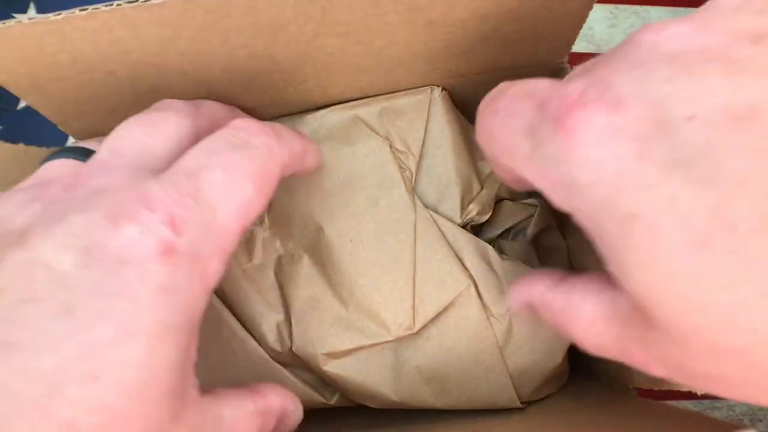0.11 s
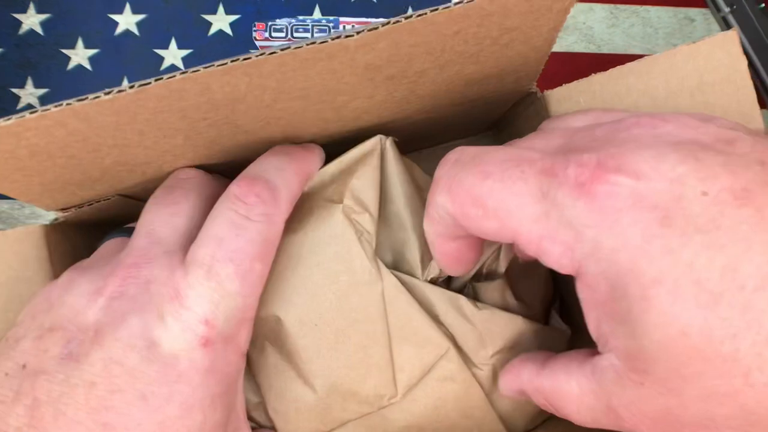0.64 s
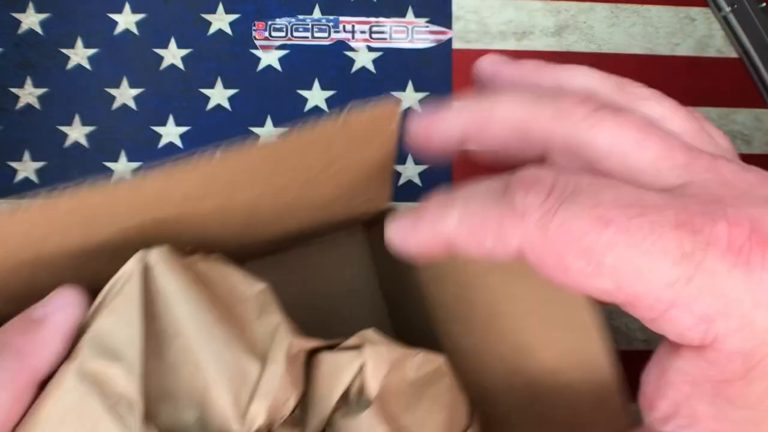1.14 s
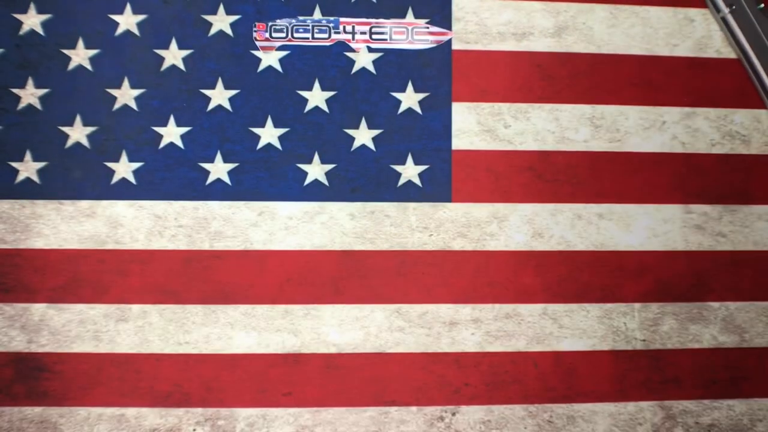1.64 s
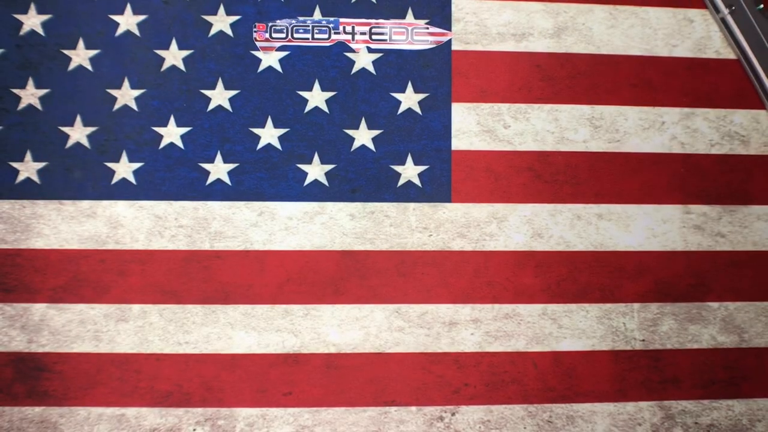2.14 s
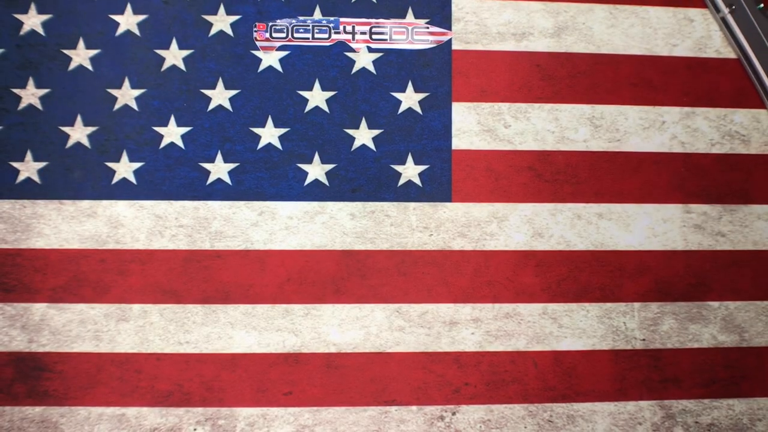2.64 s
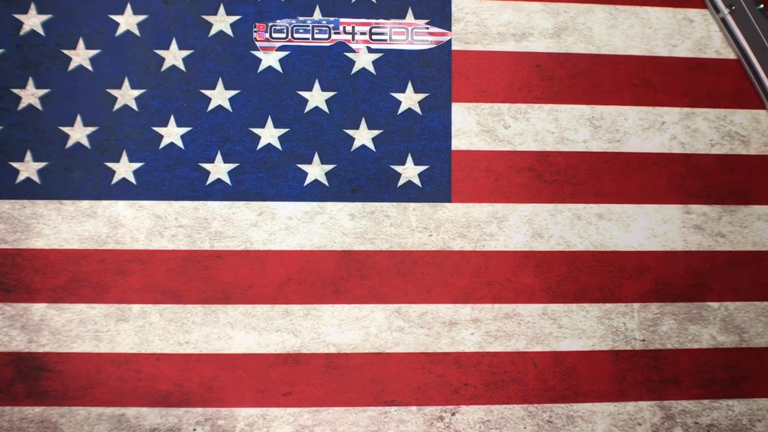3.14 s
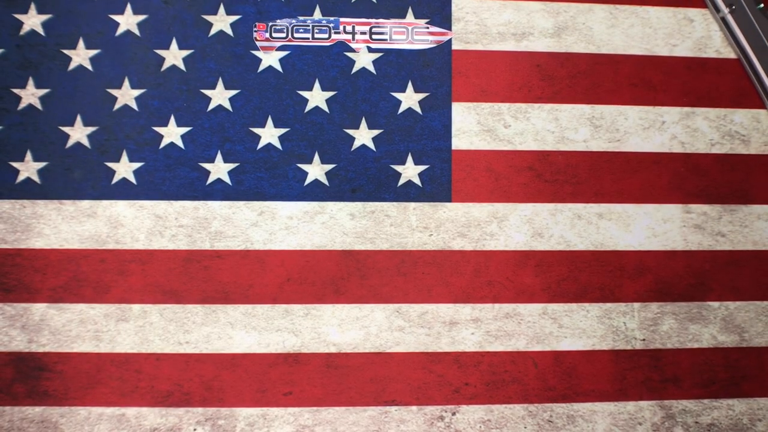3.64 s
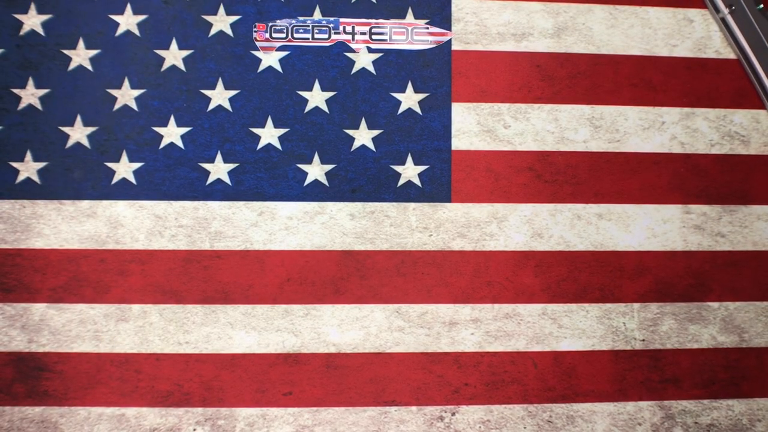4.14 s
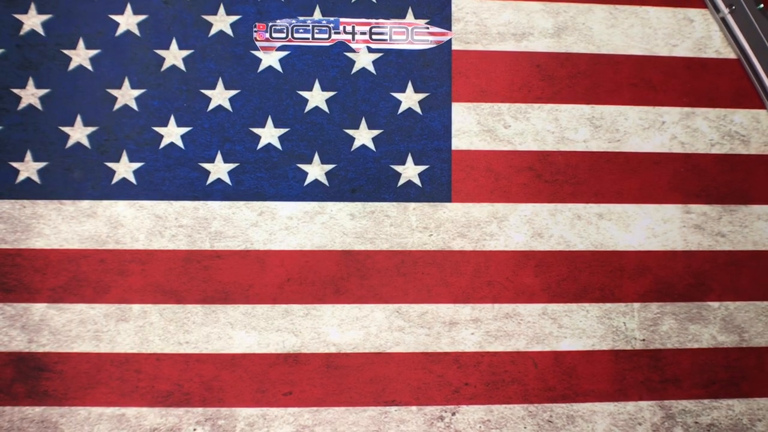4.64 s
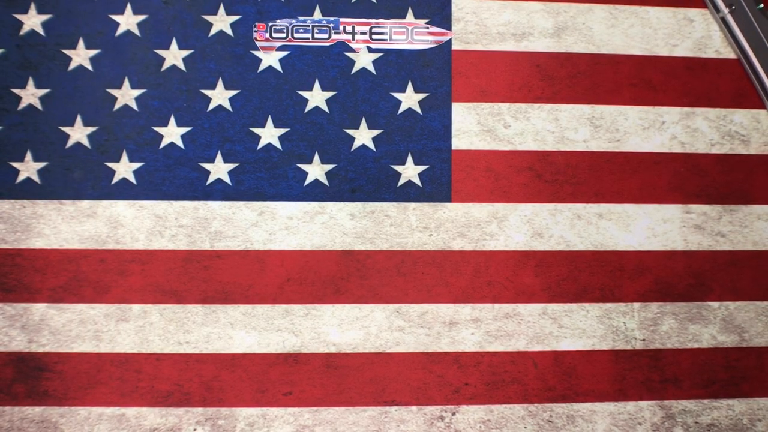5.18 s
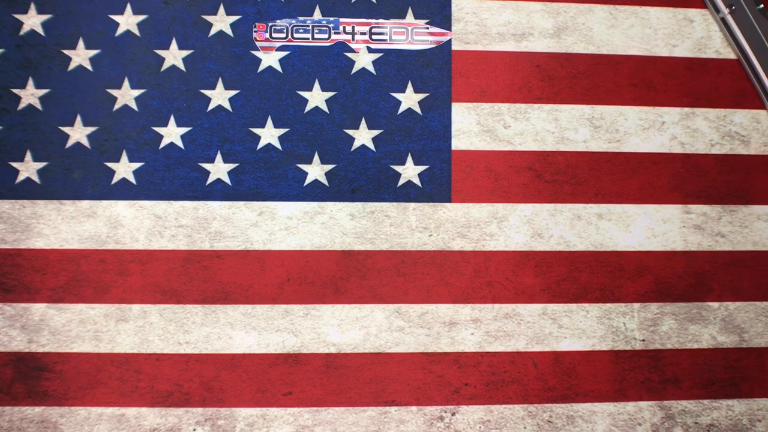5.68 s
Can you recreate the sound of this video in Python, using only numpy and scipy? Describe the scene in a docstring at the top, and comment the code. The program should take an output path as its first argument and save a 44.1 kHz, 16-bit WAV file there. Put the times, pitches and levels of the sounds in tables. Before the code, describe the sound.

A close view in sound of hands working through stiff packing paper in a cardboard box, in a small room with a short, soft tail. From 0 to 1.4 seconds the digging is busy: grainy crinkling, sharp dry cracks and short hollow knocks on the box, with a cluster of knocks around 1.1. Near 1.5 a faint, rough, high squeak lasts under a tenth of a second. From 1.6 to 2.3 it is almost quiet, with only tiny ticks. At 2.3 rapid knocks and a coarse scrape along the box wall break in, with a slight low desk thump. Bright snaps gather from 2.6, strongest around 3.2, and the rustle swells until 3.9. It dips nearly to silence around 4.2, bursts back at 4.3, is fullest near 4.6, then continues in lighter crackles and rustles to nearly 6 seconds. Very soft still air lies beneath.

```python
"""Hands dig through stiff packing paper in a cardboard box indoors, for about six seconds.
First comes busy digging: noise bursts crinkle, sharp cracks snap, and decaying tones knock on the box.
Near 1.5 s a faint wobbling tone squeaks, then it is almost quiet until knocks and a wall scrape at 2.3 s.
Bright snaps follow, the rustle swells before 4 s, dips near 4.2 s, returns, and digging goes on to the end.
Throughout, a fading noise tail is the small room, low noise is the desk, and soft noise is still air."""
import sys
import numpy as np
from scipy import signal
from scipy.fft import rfft, irfft
from scipy.io import wavfile
from scipy.ndimage import uniform_filter1d

SR = 44100
rng = np.random.default_rng(int(sys.argv[2]) if len(sys.argv) > 2 else 0)


def gain_from_db(level_db):
    """Convert decibel levels to linear amplitude factors (20 dB per decade)."""
    decades = np.asarray(level_db, float) / 20
    return 10 ** decades


def generate_wav(sig):
    """Save sig (samples, or channels by samples) to the path in sys.argv[1] as 16-bit PCM at SR."""
    pcm = np.round(np.clip(np.atleast_2d(sig).T, -1, 1) * 32767).astype(np.int16)
    wavfile.write(sys.argv[1], SR, pcm)


N = 255339  # samples


def level(x):
    """Scale a sound to an average (rms) strength of 1."""
    return x / np.sqrt(np.mean(x ** 2))


def curve(table):
    """Join the points of a timed table with straight lines, one value a sample for each column."""
    times, *columns = np.transpose(table)
    return [np.interp(np.arange(N) / SR, times, column) for column in columns]


def colour(x, points):
    """Make some pitches of a full-length sound stronger than others."""
    hz, db = np.transpose(points)
    f = np.maximum(np.arange(N // 2 + 1) * SR / N, 1)
    gain = gain_from_db(np.interp(np.log(f), np.log(hz), db))
    return irfft(rfft(x) * gain, N)


def band(x, hz, width_hz):
    """One resonance: passes sound near its pitch, unchanged at the centre."""
    b, a = signal.iirpeak(min(hz, .45 * SR), hz / width_hz, SR)
    return signal.lfilter(b, a, x)


def split(x, hz, kind):
    """Keep only the sound above ("high") or below ("low") a pitch, with a steep edge."""
    return signal.sosfilt(signal.butter(4, hz, kind, fs=SR, output="sos"), x)


def walk(rate):
    """Wander through random levels, rate new ones a second, smoothed twice; spread near 1."""
    hold = int(SR / rate)
    steps = np.repeat(rng.standard_normal(N // hold + 1), hold)
    return 1.6 * uniform_filter1d(uniform_filter1d(steps, hold), hold)[:N]


def add(out, s, sound):
    """Mix a short sound in at a time in seconds."""
    i = int(s * SR)
    out[i:i + len(sound)] += sound[:len(out) - i]


def decay(t, t60):
    """Fade by 60 dB in t60 seconds."""
    return np.exp(-np.log(1000) * t / t60)


def ring(hz, t60, t):
    """One tone of a struck object, dying away."""
    return np.sin(2 * np.pi * hz * t) * decay(t, t60)


def fall(kicks, fall_ms):
    """Let each kick jump up at once and then fade, to about a third in fall_ms."""
    return signal.lfilter([1], [1, -np.exp(-1000 / (fall_ms * SR))], kicks)


def slips(rate, fall_ms):
    """Sudden random rises, rate a second, that fall away slowly; mean 0, spread 1."""
    kicks = (rng.random(N) < rate / SR) * rng.random(N)
    rise = fall(kicks, fall_ms)
    return level(rise - rise.mean())


# tone of the still air: (pitch [Hz], relative strength [dB])
AIR_TONE = [(59, -43), (100, -11), (147, -21), (1720, -27), (4200, -43), (6290, -56), (8830, -34),
            (16000, -53)]


def still_air():
    """Steady, very soft noise of the still air, coloured by its tone table."""
    return gain_from_db(-76) * level(colour(rng.standard_normal(N), AIR_TONE))


# the desk is pushed: (time [s], sway of the stand [dB], boom of the desk top [dB])
DESK_PUSHES = [(0.0, -52, -66), (0.09, -59, -61), (0.37, -75, -62), (0.47, -59, -64), (0.71, -77.5, -56),
               (0.82, -66, -75), (0.9, -63, -57), (0.97, -70, -74), (1.1, -49, -46), (2.01, -64, -84.5),
               (2.19, -80, -88), (2.32, -58.5, -35.5), (2.37, -49, -47), (2.63, -70, -71), (2.67, -68, -56),
               (3.08, -69, -77), (3.11, -68, -55), (3.26, -74, -69), (3.92, -78, -62), (4.18, -85, -86),
               (4.31, -65, -53), (4.35, -79, -65), (4.68, -64, -63), (4.71, -62, -56), (5.47, -72, -65.5),
               (5.79, -72, -67)]


def desk():
    """Handling shakes two low resonances, the swaying stand and the booming desk top."""
    out = 0
    for db, hz, width_hz in zip(curve(DESK_PUSHES), (27, 60), (22, 55)):
        shake = band(band(rng.standard_normal(N), hz, width_hz), hz, width_hz)
        out = out + gain_from_db(db) * level(shake)
    return out


def room(x):
    """The small room answers with a tail that builds up in a few ms; its treble lasts longer."""
    room_db, low_t60_s, treble_t60_s, build_s = -11.5, 0.19, 0.34, 0.0036
    t = np.arange(SR // 2) / SR
    noise = rng.standard_normal(len(t))
    low = split(noise, 2900, "low") * decay(t, low_t60_s)
    treble = split(noise, 3600, "high") * decay(t, treble_t60_s)
    tail = (low + treble) * (1 - np.exp(-t / build_s))
    return gain_from_db(room_db) * signal.fftconvolve(x, tail / np.sqrt(np.sum(tail ** 2)))[:N]


# cardboard dragged over the desk squeaks: (time [s], middle pitch [Hz], level before roughening [dB])
SQUEAK_PATH = [(1.47, 2100, -58), (1.49, 2130, -49), (1.52, 2170, -50.5), (1.545, 2110, -55),
               (1.565, 2170, -52)]


def squeak():
    """Cardboard sticks and slips on the desk: a narrow tone, rough in pitch and level."""
    first, last = SQUEAK_PATH[0], SQUEAK_PATH[-1]
    # fade in and out over 20 ms
    path = [(first[0] - .02, first[1], -90), *SQUEAK_PATH, (last[0] + .02, last[1], -90)]
    hz, db = curve(path)
    rough_hz = hz * (1 + 0.042 * walk(400))
    tone = np.sqrt(2) * np.sin(2 * np.pi * np.cumsum(rough_hz) / SR)
    return gain_from_db(db + 4.5 * walk(250)) * tone


# resonances of the box panels, also used by crinkle():
# (pitch [Hz], relative strength [dB], time to fade 60 dB before any stretch [s])
BOX_PANELS = [(135, 4.5, 0.28), (182, 0, 0.1), (250, 3.5, 0.097), (333, -1, 0.11), (450, 2.5, 0.056),
              (530, -3.5, 0.064), (608, -1, 0.1), (845, -18, 0.039), (1250, -39, 0.31)]
# blows on the box: (time [s], peak level [dB], pitch favoured [Hz], ring stretch [times], rise [ms])
BOX_KNOCKS = [(0.135, -29, 205, 0.39, .6), (0.275, -18, 450, .48, .85), (.303, -25.5, 486, 0.75, 1),
              (0.3639, -21, 310, 0.55, .9), (.578, -29, 600, .5, 1.1), (0.875, -20, 1250, 0.12, 6),
              (.883, -20, 340, 0.22, 0.79), (1.014, -37, 250, 2.6, 1.1), (1.067, -16.5, 370, 0.49, 0.94),
              (1.078, -25.5, 600, 0.81, 1), (1.106, -26, 170, 0.67, 0.86), (1.116, -32, 350, 0.52, 1),
              (1.167, -17, 272, 0.71, 0.65), (1.178, -27, 450, 1.05, 1.1), (1.189, -26, 250, 0.51, .8),
              (1.197, -24, 410, 0.63, .7), (1.33, -27.5, 650, 0.31, .8), (1.593, -37.5, 135, 0.54, 2.8),
              (1.749, -43, 554, .45, 1.8), (1.805, -37.5, 500, .35, 1), (1.84, -42.5, 500, 0.65, 1),
              (2.286, -32.5, 194, 0.68, 1.4), (2.301, -19, 665, 0.49, 0.56), (2.309, -19, 610, 0.47, .4),
              (2.323, -30, 186, 0.99, 2.2), (2.333, -20, 530, 0.37, .4), (2.352, -31, 250, 0.43, .9),
              (2.415, -28.5, 135, 0.54, 7.1), (3.15, -21, 590, 0.31, .7), (3.323, -31, 430, 0.83, .9),
              (4.293, -32, 530, 0.54, .9), (5.094, -34, 580, 0.42, .7)]


def knocks():
    """A push excites the panels nearest in pitch most; a small box radiates no deep bass."""
    reach = 0.26  # spread around the favoured pitch, in natural log of pitch
    out, t = np.zeros(N), np.arange(SR // 4) / SR
    for s, db, centre_hz, stretch, rise_ms in BOX_KNOCKS:
        body = np.zeros(len(t))
        for hz, panel_db, t60 in BOX_PANELS:
            nearness = np.exp(-(np.log(hz / centre_hz) / reach) ** 2 / 2)
            body += gain_from_db(panel_db) * nearness * ring(hz, t60 * stretch, t)
        body = split(body * (1 - np.exp(-1000 * t / rise_ms)), 120, "high")
        add(out, s, gain_from_db(db) * body / np.abs(body).max())
    return out


# brightness of snaps and rustle, also used by crinkle(): (time [s], change of the treble [dB])
TREBLE_SHEEN = [(0, -7), (.17, 2), (.5, 0.5), (.9, 0), (1.15, 2.5), (1.6, 1.5), (1.8, -1), (2.2, -4.5),
                (2.6, -0.5), (3.3, -1.5), (3.8, -0.5), (4.0, 1), (4.2, -7), (4.4, -0.5), (4.8, 1.5),
                (5.1, 2), (5.3, -0.5), (5.79, -1.5)]
# creases that buckle, also used by settling():
# (time [s], peak level [dB], pitch [Hz], body against the facet mix [dB], length [ms])
CREASE_SNAPS = [(0.0363, -34, 1850, -14, 4.5), (0.064, -19.5, 3200, -28, 3.4), (0.1026, -26, 3280, -7, 3.7),
                (0.1317, -15, 2850, -22, 3.3), (0.1484, -31, 6890, -15, 2.3), (0.1677, -17.5, 2920, -9, 3),
                (0.18, -12.5, 1640, -20, 4.3), (0.1964, -14, 8920, -29, 4), (0.217, -15.5, 4630, -29, 1.5),
                (0.2522, -12, 8720, -20, 4.7), (0.2757, -14.5, 2740, -9, 5.7),
                (0.3027, -22, 2640, -17, 5.2), (0.3274, -9, 7760, -33, 2.1), (0.406, -21, 1740, -20, 3),
                (0.4308, -16, 1830, -21, 1.4), (0.4665, -14, 1700, 11, 3.9), (0.4872, -13.5, 3780, -11, 1),
                (0.5004, -17.5, 1730, -4, 4.1), (0.5176, -11.5, 3870, -16, 1.9),
                (0.5282, -12.5, 8900, -11, 2.9), (0.5472, -14, 4230, -20, 4.8),
                (0.581, -16, 2400, -12, 3.9), (0.6094, -18, 4000, -23, 3.5), (0.6185, -19.5, 3250, -7, 9),
                (0.6648, -14, 2820, -3, 5.9), (0.695, -12, 8300, -28, 1.2), (0.7831, -19.5, 8550, -24, 1.9),
                (0.8724, -20.5, 3820, 0, 2), (1.067, -19, 6740, -16, 3.2), (1.078, -20, 4900, -11, 5),
                (1.1318, -14.5, 3470, -24, 3), (1.1611, -14, 8650, -26, 2.1), (1.2835, -28, 7520, -21, 2.3),
                (1.5942, -34.5, 1990, 2, 2.2), (1.7474, -46, 3440, -1, 2.1), (1.7858, -33, 3350, 0, 2.6),
                (1.864, -41, 2730, -16, 1.7), (2.0287, -53, 1530, -10, 3.6),
                (2.0575, -32.5, 3950, -33, 3.8), (2.2179, -54.5, 8800, -15, 4.4),
                (2.2862, -35, 2270, 2, 3.8), (2.2997, -26, 2080, 2, 9), (2.414, -27, 6970, -17, 2.6),
                (2.4627, -20, 4450, -27, 1), (2.514, -31, 9050, -24, 1.2), (2.5295, -21, 9300, -27, 3),
                (2.592, -21, 3400, -27, 2.3), (2.6353, -12.5, 3180, -19, 3.3),
                (2.6781, -15.5, 8100, -23, 1.1), (2.7437, -23, 1750, -8, 3.3),
                (2.7791, -22, 7580, -23, 3.5), (2.8067, -22, 8110, -19, 2.6),
                (2.8192, -20.5, 7250, -5, 3.3), (2.8523, -20, 2360, -21, 3.2), (2.8857, -24, 1680, -9, 3.3),
                (2.9243, -23.5, 3350, -15, 3.8), (2.947, -27, 5440, -12, 2.7),
                (2.9633, -10, 7740, -9.5, 1.3), (3.0416, -24, 4110, -17, 2.4), (3.0584, -29, 4160, -17, 3),
                (3.1065, -17, 8650, -7, 8.1), (3.1132, -11.5, 4330, -13, 3.3), (3.128, -21, 7500, -22, 2.1),
                (3.1506, -17, 8620, -14, 2.5), (3.1635, -5, 8120, -35, 1.6), (3.172, -8.5, 9000, -34, 1.5),
                (3.2008, -18, 7500, -16, 2.3), (3.2251, -35, 8050, -18, 4.5),
                (3.247, -18.5, 7900, -25, 1.9), (3.2885, -15, 8000, -8.5, 2.6),
                (3.3238, -20.5, 3420, -13, 2.2), (3.3633, -18.5, 1860, -9, 3.5),
                (3.3727, -19.5, 3080, -13, 4.6), (3.3935, -17, 8100, -16, 1.7),
                (3.4303, -8.5, 8350, -31, 3), (3.4374, -20, 7980, -22, 1), (3.449, -21, 5410, -25, 1.8),
                (3.454, -14.5, 8850, -25, 2.6), (3.5039, -14, 8840, -22, 1.5),
                (3.5144, -16, 4550, -18, 1.1), (3.5389, -24, 7130, -23, 2), (3.6108, -16.5, 7020, -14, 1.2),
                (3.6114, -19, 8800, -13, 3), (3.627, -18, 8700, -21, 2.3), (3.6556, -17.5, 1710, -21, 3.4),
                (3.6944, -19, 2130, 5, 7.5), (3.7189, -15, 1800, -10, 1.4), (3.8198, -15, 4900, -22, 2.4),
                (3.8611, -12.5, 7200, -23, 1), (3.9764, -22.5, 2870, -23, 2.1),
                (4.0202, -22, 1720, -23, 2.2), (4.046, -24.5, 8600, -12, 1.9), (4.067, -28, 8960, -20, 2.5),
                (4.123, -33.5, 3050, -11, 4.1), (4.1845, -32, 1870, -11, 3.1),
                (4.2098, -37, 3840, -13, 4.3), (4.2576, -32, 1910, -12, 2.4), (4.2676, -29, 2030, -11, 3.9),
                (4.3007, -17, 4200, -21, 4.1), (4.327, -21, 7600, -21, 1.6), (4.3611, -17, 8300, -23, 9),
                (4.3864, -23, 8200, -19, 1.6), (4.472, -18, 5230, -14, 3), (4.4814, -20, 9030, -11, 2.1),
                (4.495, -18, 7600, -15, 1.6), (4.6044, -29, 8550, -21, 1.2),
                (4.6204, -16.5, 8550, -20, 3.7), (4.6746, -8.5, 5900, -10, 1.1),
                (4.7022, -24, 7200, -18, 3), (4.717, -9, 11400, -7, 1.8), (4.777, -16.5, 4350, -17, 6.5),
                (4.808, -17, 3430, -9, 3.2), (4.8524, -21.5, 3380, -17, 6.4), (4.8688, -19.5, 3720, -25, 3),
                (4.923, -19.5, 1700, 6, 3.6), (4.9417, -13.5, 5330, -15, 3), (4.9624, -17, 4270, -27, 5.2),
                (4.993, -13, 2660, -23, 1.1), (5.0235, -23, 9190, -18.5, 3.4), (5.0767, -25, 2920, -28, 3),
                (5.1058, -23.5, 3070, -22, 1.6), (5.1317, -40, 3230, -12, 3.6),
                (5.1894, -15, 9150, -23, 4.3), (5.2282, -29, 3930, -10, 1), (5.341, -22.5, 2560, -39, 9),
                (5.4146, -27, 1580, -17, 2.8), (5.4655, -29, 3070, -16, 1.3),
                (5.5319, -21, 9050, -2.5, 6.7), (5.6045, -30, 7310, -19, 2.4),
                (5.6233, -24, 3900, -20, 1.04), (5.6497, -22, 3840, -29, 1), (5.709, -27, 3930, -11, 1),
                (5.7593, -26.5, 8000, -12, 3.7)]


def snaps():
    """A crease gives way in a few ms: a crack, then a burst that rings the facet beside it."""
    broad, attack_ms, crack_ms = 0.89, 0.14, 1.5
    out, ms = np.zeros(N), 1000 * np.arange(1024) / SR
    noises = rng.standard_normal((len(CREASE_SNAPS), 3, 1024))
    for (s, db, hz, body_db, length_ms), noise in zip(CREASE_SNAPS, noises):
        edge_db = -7 + np.interp(s, *np.transpose(TREBLE_SHEEN))
        shape = (1 - np.exp(-ms / attack_ms)) * (np.exp(-ms / length_ms) + np.exp(-ms / crack_ms))
        # the facet's own pitch over a broad paper sound
        own = level(band(noise[0], hz, .1 * hz))
        paper = level(band(noise[0], 4840, 5100) + 0.73 * band(noise[0], 7460, 1800))
        facet = level(own + broad * paper)
        body = level(band(noise[1], 1230, 1900))
        edge = level(split(noise[2], 12800, "high")) * np.exp(-ms / 4)
        burst = shape * (facet + gain_from_db(body_db) * body + gain_from_db(edge_db) * edge)
        add(out, s, gain_from_db(db) * burst / np.abs(burst).max())
    return out


def settling():
    """Every snap sets the sheet rustling for a moment, in proportion to its strength and length."""
    settle_db = -36  # start of the rustle after a 1 ms snap, against the snap's peak
    kicks = np.zeros(N)
    for s, db, _, _, length_ms in CREASE_SNAPS:
        add(kicks, s, np.array([gain_from_db(db + settle_db) * length_ms]))
    return fall(kicks, 16.2)


# digging of the hands: (time [s], thin paper [dB], larger sheets above the thin paper [dB])
HAND_DIGGING = [(0, -44.5, -6), (.09, -53, -2), (.19, -36.5, -1.5), (.31, -37.5, -2), (.355, -46, -8),
                (.41, -38.5, 4.5), (.53, -44, 4.5), (.7, -36.5, 0), (.84, -40.5, 1.5), (.885, -36.5, 5),
                (.92, -39, -7), (1.0, -39.5, -12), (1.13, -39.5, -2), (1.27, -43, 0), (1.43, -47.5, -1.5),
                (1.575, -44, -6.5), (1.64, -84, 4), (1.7, -79, 7), (1.735, -57, 5), (1.81, -71.5, 8.5),
                (1.92, -59, -6), (1.975, -80.5, 2), (2.16, -81, -1), (2.275, -81, 7), (2.3, -43.5, -10),
                (2.385, -62, 3), (2.43, -49.5, -0.5), (2.57, -62, 4.5), (2.68, -43, -1), (2.97, -47, 2),
                (3.09, -42, -4), (3.23, -48.5, 1), (3.37, -42, 3), (3.55, -37, -3.5), (3.74, -34.5, 2.5),
                (3.8, -37, 3.5), (3.83, -29.5, -2.5), (3.91, -29, -3), (4.03, -52.5, 1), (4.17, -82, 9.5),
                (4.25, -73, 10), (4.275, -50, 7.5), (4.31, -34.5, -4.5), (4.45, -34.5, -2.5),
                (4.55, -25.5, -3.5), (4.65, -32, -6.5), (4.75, -31, -2), (4.85, -45.5, 0),
                (4.96, -32.5, -9.5), (5.06, -44, -5), (5.3, -49, 3.5), (5.57, -45.5, -5),
                (5.635, -41, -1.5), (5.74, -53, 11), (5.79, -34.5, -7)]
# paper scraping the box walls: (time [s], level [dB])
WALL_SCRAPES = [(0, -43), (.14, -39), (.36, -45.5), (.52, -40), (.98, -45.5), (1.1, -38.5), (1.5, -50),
                (1.64, -49.5), (1.7, -72), (1.78, -56), (1.92, -61), (1.99, -74), (2.17, -73.5),
                (2.275, -65), (2.315, -24.5), (2.39, -49), (2.55, -54.5), (3.2, -53.5), (3.55, -49.5),
                (3.8, -35.5), (3.95, -51), (4.15, -61), (4.25, -74), (4.27, -41.5), (4.45, -45.5),
                (4.55, -41.5), (4.75, -44), (4.85, -50.5), (4.96, -43), (5.07, -54.5), (5.2, -41.5),
                (5.27, -48.5), (5.5, -51), (5.79, -47)]
# tone of the paper: (pitch [Hz], relative strength [dB])
PAPER_TONE = [(180, -37.5), (300, 1), (656, 5), (885, -2), (961, 4.5), (1280, 2), (1750, 3.5), (2030, 1.5),
              (6100, -0.5), (8940, 5.5), (10700, -5), (13300, -3), (16000, -10.5)]


def crinkle():
    """Countless small creases, each a burst around its own pitch, over rubbing sheets and wall scrapes."""
    rate, spread_db, burst_ms = 350, 4.5, 4.0  # rate: creases a second at each pitch
    rub_db, gust_db, low_tilt = -6, 3.5, 0.48
    thin_db, fuller_db = curve(HAND_DIGGING)
    wall_db, = curve(WALL_SCRAPES)
    creases = 0
    for hz in (1300., 2400., 4200., 7200., 12000.):
        # most creases are tiny, a few are large
        sizes = gain_from_db(np.minimum(spread_db * rng.exponential(size=N), 11))
        kicks = (rng.random(N) < rate / SR) * sizes
        burst = fall(kicks, burst_ms) * rng.standard_normal(N)
        pitched = (hz / 4200) ** low_tilt * band(burst, hz, 0.85 * hz)
        creases = creases + 0.6 * burst + 1.74 * pitched
    rub = gain_from_db(rub_db + 0.37 * walk(26.5)) * rng.standard_normal(N)
    # the grip slips suddenly, so creases come in clusters that die away
    gusts = gain_from_db(gust_db * np.minimum(slips(45, 36.4), 1.1))
    sheet = colour(gusts * level(creases) + rub, PAPER_TONE)
    thin, full = split(sheet, 3940, "high"), split(sheet, 3580, "low")
    sheen_db, = curve(TREBLE_SHEEN)
    thin = thin + (gain_from_db(sheen_db) - 1) * split(thin, 6800, "high")
    rustle = (gain_from_db(thin_db) + settling()) * (level(thin) + gain_from_db(fuller_db) * level(full))
    # paper scraping the walls sets the panels humming
    scrape = gain_from_db(5.1 * np.minimum(slips(40, 18), 1.5)) * rng.standard_normal(N)
    hum = sum(gain_from_db(db) * band(scrape, hz, 5.9 / t60) for hz, db, t60 in BOX_PANELS)
    wall = split(hum, 96, "high")
    return rustle + gain_from_db(wall_db) * level(wall)


def scene():
    """Paper and box in the room, the desk and the still air."""
    near = crinkle() + snaps() + knocks() + squeak()
    mix = near + room(near) + desk() + still_air()
    return mix[None]


def band_limit(x):
    """A steep low-pass at the top of the band."""
    return signal.sosfilt(signal.butter(12, 16810, fs=SR, output="sos"), x)


def record(dry):
    """The recorder cuts the sound above 15.9 kHz and adds its small constant zero error."""
    top_cut = signal.ellip(8, .2, 35, 15900, fs=SR, output="sos")
    finished = signal.sosfilt(top_cut, dry) + .0007
    return band_limit(finished)


dry = scene()
out = record(dry)
generate_wav(out)
```